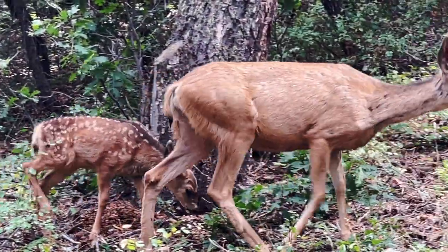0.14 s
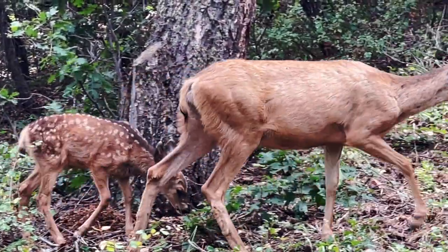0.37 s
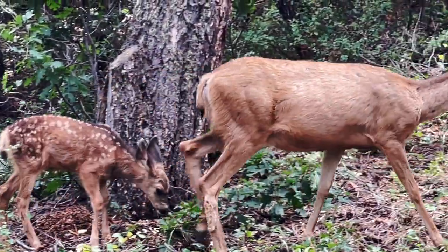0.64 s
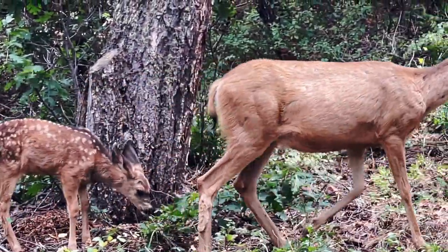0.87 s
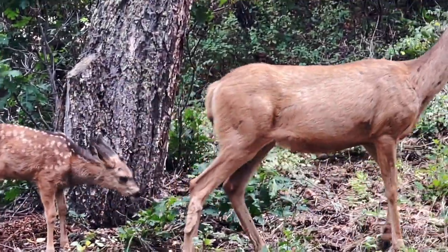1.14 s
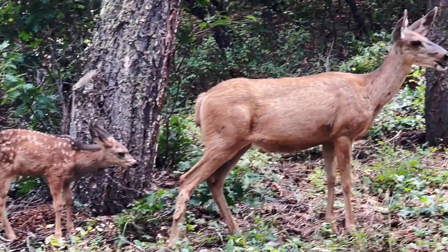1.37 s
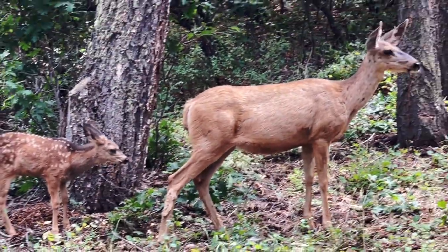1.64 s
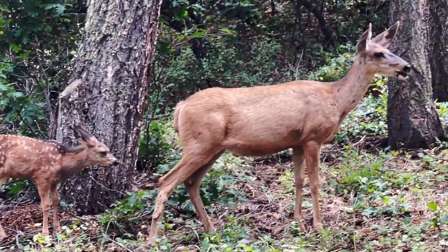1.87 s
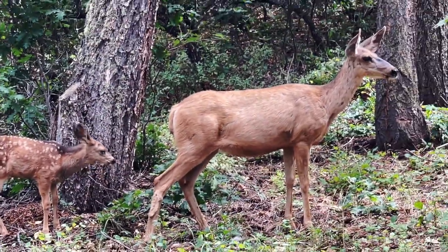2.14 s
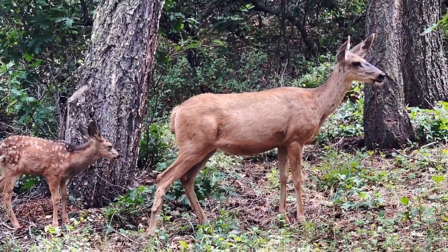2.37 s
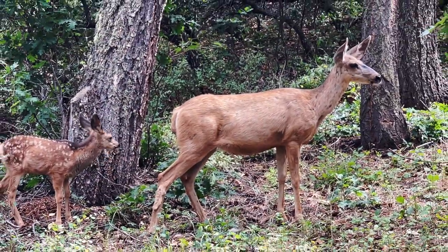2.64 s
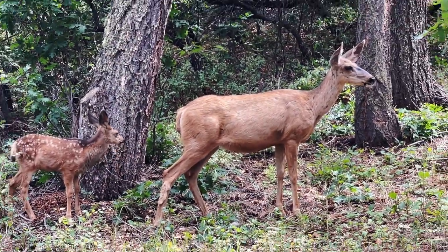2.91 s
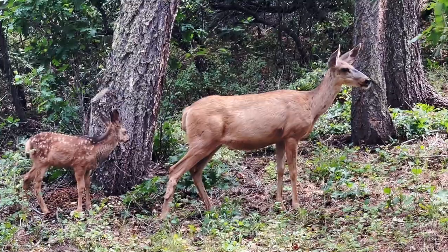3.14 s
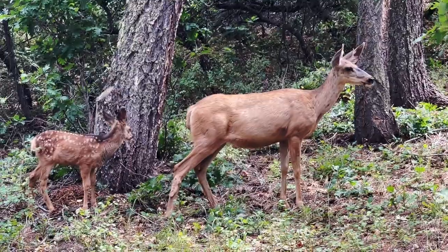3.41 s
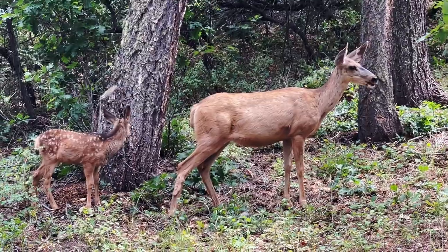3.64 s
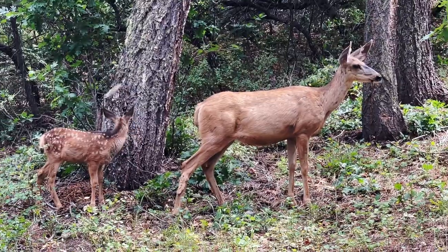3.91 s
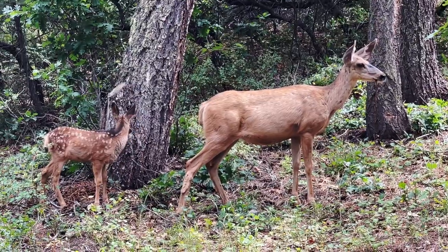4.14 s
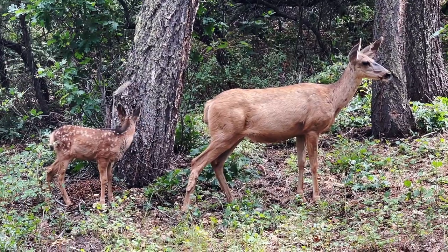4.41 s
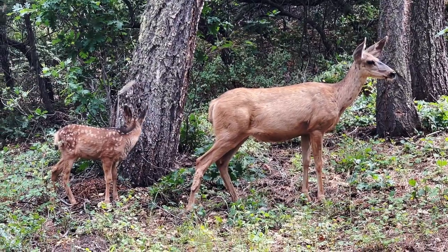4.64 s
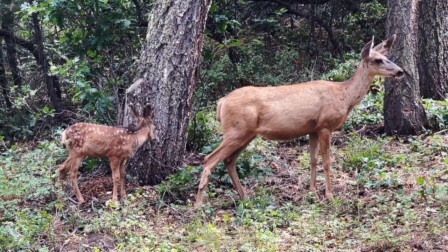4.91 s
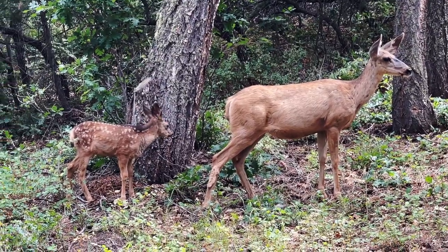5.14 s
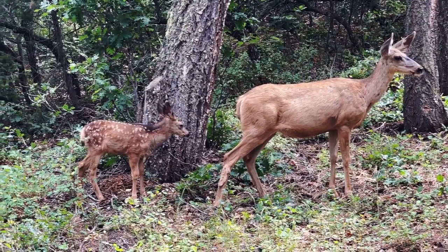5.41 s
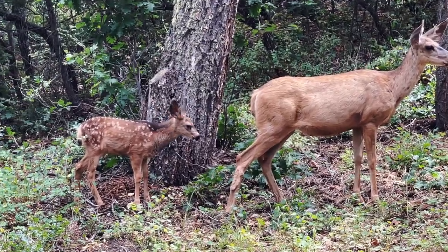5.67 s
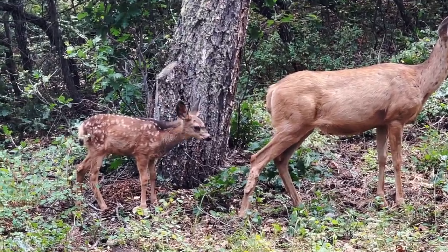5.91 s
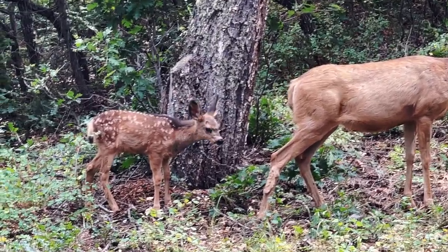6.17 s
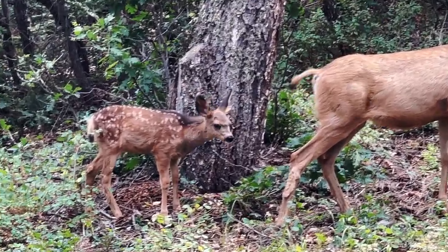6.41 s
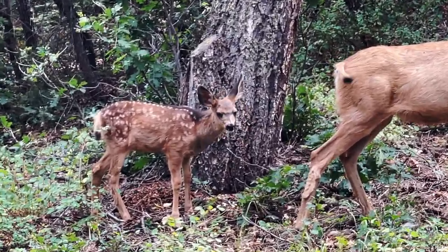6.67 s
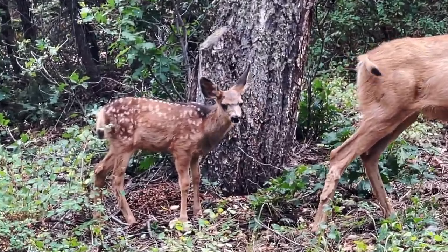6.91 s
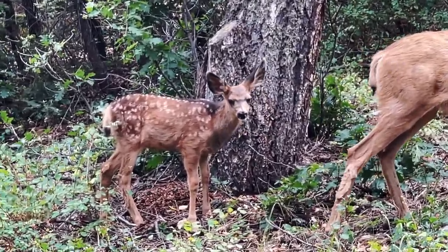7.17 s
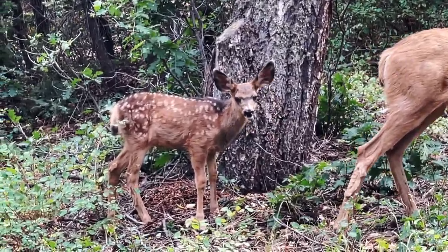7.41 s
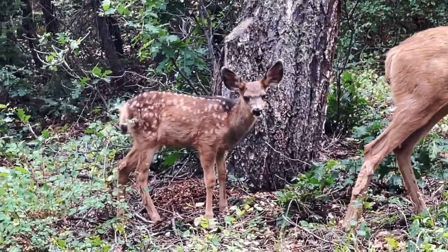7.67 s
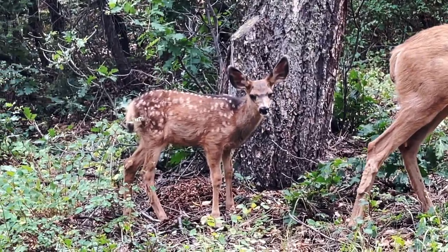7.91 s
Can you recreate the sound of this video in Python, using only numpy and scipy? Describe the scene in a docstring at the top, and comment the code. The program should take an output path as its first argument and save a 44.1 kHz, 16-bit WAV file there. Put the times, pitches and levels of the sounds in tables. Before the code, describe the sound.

A calm forest with a doe and fawn, heard only as surroundings. Thin insect shimmer and soft air noise run throughout, with tiny dry leaf rustles and a pulsing cricket-like tone at first. A loud, clear bird then sings six rapid four-note phrases, nearly four per second, with short woody echoes. When it stops, remote chips, a repeated echoing song, faint caws and small wing buzzes carry on to the end.

```python
"""A songbird close by sings one burst of six four-note phrases of gliding tones in a summer wood.
Farther birds whistle, chip and caw as frequency-modulated tones, blurred by echoes off the trunks.
Insects drone, sound thin tones and buzz, some as throbbing or gated noise bands; leaves rustle briefly.
Filtered noise gives a faint band that swells while the near bird sings, a low rumble, a hum and
microphone hiss; further treble noise rises with the near song's level."""
import sys
import numpy as np
from scipy import signal
from scipy.io import wavfile
from scipy.ndimage import uniform_filter1d

SR = 44100
rng = np.random.default_rng(int(sys.argv[2]) if len(sys.argv) > 2 else 0)


def linear_from_db(decibels):
    """Turn decibels (scalar or array-like) into linear amplitude factors; 0 gives 1."""
    return 10 ** (np.asarray(decibels, float) / 20)


def waveform_to_disk(signal):
    """Save audio, clipped to [-1, 1], as 16-bit WAV at the path in sys.argv[1]."""
    frames = np.transpose(np.atleast_2d(signal))
    scaled = np.clip(frames, -1, 1) * 32767
    samples = np.round(scaled).astype(np.int16)
    wavfile.write(sys.argv[1], SR, samples)


N = 355000

# Pitch and level contours of bird notes, before each note's own pitch, level and length are applied:
# name: (time after the start [ms], frequency [Hz], relative level [dB])
NOTE_SHAPES = { "flick": [(-9, 1192, -31.5), (-4, 2600, -24.5), (0.5, 3560, -9), (3, 3850, -1),
               (4, 3800, -5.5), (7, 3230, 3), (8.5, 2820, -8), (11.5, 2566, -1), (16.5, 2420, -13),
               (19, 1900, -33)], "scoop": [(-2, 3730, -28.5), (1, 3600, -14), (5, 2700, -6.5),
               (8.5, 2510, 1), (10.5, 2440, -2.5), (16.5, 2450, -3), (18.5, 2600, -5.5), (24.5, 2400, -25)],
               "slide": [(-3, 3200, -20.5), (2.5, 3250, -4), (7.5, 3150, -2.5), (17, 2800, 2),
               (31, 2620, -2.5), (34, 2700, -22)], "wave": [(-2, 2043, -22), (4, 2060, -11),
               (11, 2200, -11), (17, 2680, 2), (23.5, 2950, -5.5), (31.5, 3000, -3), (39, 2720, -10.5),
               (44, 2280, -9), (48.5, 2090, -7.5), (63.5, 2036, -10), (71, 1990, -23)],
               "chip": [(0, 2500, -17.5), (4, 3050, -9.5), (8, 3420, -2.5), (13, 3490, 1), (19, 3400, -2),
               (24.6, 3200, -5.5), (29.3, 3050, -20)], "step": [(0, 2500, -7), (14.25, 2880, -13.5),
               (30.8, 3080, -4), (37.25, 2850, -7), (43.2, 2800, -6), (51.7, 2440, -0.5), (61.2, 2420, 4.5),
               (69, 2360, -26)], "slip": [(0, 3730, -4), (13.2, 3640, -2), (28, 3200, -10)],
               "arch": [(0, 2200, -28), (8, 2300, -1.5), (28.1, 2430, -5.5), (44.8, 2660, -5.5),
               (57, 2690, -4), (70.6, 2350, 0), (81.7, 2080, -16.5), (106.1, 1800, -21.5),
               (139, 1560, -20)], "peak": [(0, 2150, -19), (4.96, 2400, -0.5), (14.47, 2620, -5),
               (21.7, 2640, -6), (31, 2280, -2), (38, 2080, -29)], "pip": [(0, 2660, -8), (13, 2660, 0),
               (27, 2630, -9.5)], "droop": [(0, 2080, -9.5), (15.1, 2150, -7), (35, 2170, 0.5),
               (60.7, 2040, -6.5), (86, 1850, -12.5), (100, 1720, -15)], "vee": [(0, 4450, -5),
               (10, 4150, -14), (24, 3600, -4), (33, 3300, 0), (43, 3000, -22), (53, 2950, -3),
               (63, 3450, 2), (70, 4000, -11), (75, 4350, -5), (79, 4450, -16)], "cup": [(0, 2480, 1),
               (17.6, 2220, 2), (36, 2400, -11)], }
# Phrases of the far bird with an arching last note: (time [s], level [dB], note spacing factor [1])
ARCH_PHRASES = [(5.213, -53, 1.02), (5.665, -50, 1.02), (6.116, -50.5, 1.01), (6.593, -51, 1.015)]


def rms_one(x):
    """Normalization: divides a signal by its root mean square."""
    return x / np.sqrt(np.mean(x ** 2) + 1e-20)


def band(x, low_hz, high_hz, order=2):
    """Band limitation: a Butterworth filter passes one range of frequencies."""
    return signal.sosfilt(signal.butter(order, [low_hz, high_hz], "band", fs=SR, output="sos"), x)


def at_hz(points, hz):
    """Logarithmic frequency scale: interpolates a spectrum linearly in log frequency."""
    points = np.array(points)
    return np.interp(np.log(hz), np.log(points[:, 0]), points[:, 1])


def drift(rate_hz):
    """Random fluctuation: white noise through a two-pole low-pass, with an rms of 1."""
    pole = np.exp(-40 * np.pi * rate_hz / SR)  # run at SR / 20
    white = rng.standard_normal(N // 20 + 4002)
    slow = signal.lfilter([1], [1, -2 * pole, pole * pole], white)[4000:]  # without the onset
    return np.interp(np.arange(N) / 20, np.arange(len(slow)), rms_one(slow))


def add(out, rows, partials=((1, 0),), pan_db=0, rough=0):
    """Frequency modulation: adds harmonics whose phase is the integral of a gliding, jittered pitch."""
    # rows: (time [s], frequency [Hz], rms level [dB]); partials: (multiple [1], level [dB])
    s, hz, db = np.transpose(rows)
    at = np.arange(round(s[0] * SR), min(round(s[-1] * SR), N))
    t = at / SR
    # rough is the rms pitch jitter as a share of the pitch
    jitter = rms_one(uniform_filter1d(rng.standard_normal(SR), size=80))[:len(at)]
    pitch = uniform_filter1d(np.interp(t, s, hz), size=60) * (1 + rough * jitter)
    phase = 2 * np.pi * np.cumsum(pitch) / SR
    fade = np.clip(np.minimum(t - s[0], s[-1] - t) / .002, 0, 1)  # 2 ms at both ends
    start = rng.uniform(0, 2 * np.pi)
    tone = sum(linear_from_db(k_db) * np.sin(k * (phase + start)) for k, k_db in partials)
    ears = linear_from_db(np.array([[pan_db / 2], [-pan_db / 2]]))  # positive pan_db: louder on the left
    out[:, at] += np.sqrt(2) * linear_from_db(np.interp(t, s, db)) * fade * tone * ears


def placed(shape, s, db, pitch, length=1):
    """Scaling of a contour: sets its onset and level, and multiplies its pitch and duration."""
    return np.array(shape) * [length / 1000, pitch, 1] + [s, 0, db]  # ms to s


def wood(x, parts, gap_s):
    """Reverberation: convolution with exponentially decaying noise, independent in each ear."""
    # parts: (60 dB decay time [s], echo level [dB]); the echoes build up over gap_s
    t = np.arange(2 * SR) / SR
    echo = 0
    for t60, db in parts:
        tail = rng.standard_normal((2, len(t))) * linear_from_db(-60 * t / t60) * np.clip(t / gap_s, 0, 1)
        echo = echo + linear_from_db(db) * tail / np.sqrt(np.sum(tail ** 2, axis=1, keepdims=True))
    return x + signal.fftconvolve(x, echo, axes=1)[:, :N]


def bursts(rows, noise, rise_s):
    """Amplitude gating: noise under a trapezoid for each row (time [s], duration [s], level [dB])."""
    t = np.arange(N) / SR
    gates = [linear_from_db(db) * np.clip(np.minimum(t - s, s + length - t) / rise_s, 0, 1) for s, length, db in rows]
    return noise * sum(gates)


def drone():
    """Amplitude modulation: resonant noise bands of many insects throb in loose step."""
    # Resonances of the insect chorus: (center frequency [Hz], width [Hz], relative level [dB])
    resonances = [(5240, 420, -5), (5407, 56, -5.5), (5518, 156.97, -1.5), (5681.7, 79, -8),
                  (5766, 247, -4.5), (6056, 355, -10)]
    # Course of the mean level of both ears: (time [s], rms level [dB])
    level_points = [(0.0, -59.5), (.52, -57), (.94, -58.5), (2.6, -56.5), (3.85, -58), (5.83, -57.4),
                    (7.548, -57), (8.05, -57.5)]
    throb_hz = 30.5 + 0.8841 * drift(1.6942)
    throb = np.sin(2 * np.pi * np.cumsum(throb_hz) / SR)
    out = 0
    for hz, width, db in resonances:
        grain_db = 1.678 * throb + 1.3 * drift(60)
        noise = rng.standard_normal((2, N)) * linear_from_db(grain_db)
        out = out + linear_from_db(db) * rms_one(band(noise, hz - width / 2, hz + width / 2, order=3))
    level = np.interp(np.arange(N) / SR, *np.transpose(level_points))
    return linear_from_db(level + np.array([[.8], [-.8]])) * rms_one(out)


def floor():
    """Partial coherence: air, far rumble and hiss in third octaves, each with its own ear correlation."""
    # Shape of the noise spectrum: (frequency [Hz], relative spectral density [dB per Hz])
    spectrum = [(25, -22), (60, -6), (120, -11), (180, -7), (284, -15), (342, -10), (572, -15), (1150, -15),
                (2030, -20), (3000, -18.5), (4500, -24.5), (5800, -33.5), (7300, -42), (11000, -33),
                (15800, -37.5)]
    # Likeness of the two ears: (frequency [Hz], left-right correlation [1])
    correlation = [(60, 0.73), (130, 0.6955), (290, 0.23), (640, -0.4), (1410, -0.069), (3100, -0.4534),
                   (6820, -0.32), (15000, 0.25)]
    out, edges = 0, 25 * 2 ** np.arange(0, 9.5, 1 / 3)
    white = rng.standard_normal((2, 2, N))
    for k, (low, high) in enumerate(zip(edges, edges[1:])):
        mid, side = band(white[k % 2], low, high, order=4)  # neighbors use different noise
        hz = np.sqrt(low * high)
        alike = np.clip(at_hz(correlation, hz), -1, 1)
        ears = np.sqrt(1 + alike) * mid + np.sqrt(1 - alike) * side * [[1], [-1]]
        out = out + linear_from_db(at_hz(spectrum, hz)) * ears
    return linear_from_db(-63.5) * rms_one(out)


def hum():
    """Narrow-band noise: a bandwidth of a few hertz makes a low hum waver, alike in both ears."""
    center_hz, width_hz, level_db = 77.66, 9.2, -68
    noise = band(rng.standard_normal(N), center_hz - width_hz / 2, center_hz + width_hz / 2)
    return linear_from_db(level_db) * rms_one(noise)


def swelling_band():
    """Incoherent noise: a faint band, independent in the two ears, swells while the near bird sings."""
    # Course of the level before its random fluctuation: (time [s], rms level [dB])
    level_points = [(0.0, -85), (1.05, -83), (1.23, -72.5), (1.55, -68), (1.9, -62), (2.85, -65),
                    (3.1, -69.5), (4.35, -78), (4.62, -76.5), (8.05, -75.5)]
    level = np.interp(np.arange(N) / SR, *np.transpose(level_points))
    return rms_one(band(rng.standard_normal((2, N)), 3400, 5150)) * linear_from_db(level + 1.7 * drift(8))


def rumble():
    """Random amplitude modulation: low noise swells and fades, alike in both ears."""
    level_db, swing_db, rate_hz = -68, 1.5, 1.9
    noise = rms_one(band(rng.standard_normal(N), 62, 117.7))
    return noise * linear_from_db(level_db + swing_db * drift(rate_hz))


def caws():
    """Harmonic spectrum: a throat weights the multiples of a nasal, falling fundamental."""
    # Contour of a caw: (time after the start [ms], frequency [Hz], relative level [dB])
    contour = [(0, 317, -13), (30, 327.5, -6.5), (111.7, 326, -2.5), (149.3, 306.5, -4), (193.6, 291, -1),
               (250, 279.5, -8.5)]
    # Calls: (time [s], level [dB], pitch factor [1])
    calls = [(.235, -64, 0.99), (1.680, -65.5, 0.99), (2.850, -65.5, 0.94), (4.200, -66.5, 0.93),
             (5.600, -65.5, 0.93), (6.90, -64.5, 0.99)]
    # Throat in the first part of a caw: (multiple of the fundamental [1], level [dB])
    throat = [(2, -11), (3, -19.5), (4, -2.5), (5, -5.5), (6, -1.5), (7, -22)]
    # Throat as the caw falls, with fewer harmonics: (multiple of the fundamental [1], level [dB])
    falling_throat = [(4, -17), (5, -13.5), (6, -2)]
    out = np.zeros((2, N))
    for call in calls:
        add(out, placed(contour[:3], *call), throat, rough=0.011)
        add(out, placed(contour[2:], *call), falling_throat, rough=0.0066)
    return out


def rustles():
    """Broadband friction: dry leaves as brief bursts of bright noise."""
    # Rustles: (time [s], duration [s], level [dB])
    rows = [(.265, 0.022, -63), (.50, 0.026, -64), (1.025, .025, -61.5), (3.79, 0.017, -63),
            (5.15, 0.01033, -74), (5.61, 0.01808, -77)]
    return bursts(rows, rms_one(band(rng.standard_normal((2, N)), 3400, 6400)), rise_s=0.006)


def far_whistles():
    """Linear frequency glide: short bird whistles, each loudest midway."""
    # Whistles: (time [s], duration [s], start frequency [Hz], end frequency [Hz], rms level midway [dB])
    whistles = [(0.417, 0.015, 4000, 3950, -73), (4.767, 0.027, 4350, 4140, -68),
                (5.24, .025, 4370, 3520, -69), (5.432, 0.027, 3600, 3350, -66),
                (.481, .029, 3110, 3680, -64), (.550, .02, 3720, 3930, -70), (.615, .02, 3780, 3870, -72),
                (0.706, 0.028, 3900, 3750, -72), (1.137, .015, 2400, 2350, -64),
                (1.145, .017, 3970, 3780, -63), (1.171, .05, 4220, 3700, -59.5),
                (1.375, 0.031, 3910, 3650, -63), (1.467, .025, 3850, 4070, -69),
                (1.548, .05, 4310, 3600, -56), (3.346, 0.039, 2214, 2680, -58.5),
                (3.349, .064, 4734, 4720, -62), (3.441, 0.025, 2673, 2530, -59.5),
                (3.49, 0.14, 2270, 2283, -66), (3.915, 0.035, 3900, 3030, -65),
                (4.705, 0.035, 3440, 3880, -65), (6.582, 0.021, 3960, 4060, -56.5),
                (4.136, 0.024, 4140, 3990, -62.5), (4.212, 0.018, 3940, 3980, -70),
                (4.298, 0.024, 2150, 2610, -62), (4.373, 0.021, 2040, 2670, -57.5),
                (4.365, .014, 3670, 4200, -64), (4.51, 0.02, 2200, 2720, -59.5),
                (4.833, 0.019, 3900, 3790, -58.5), (4.827, 0.096, 2420, 2413, -70.5),
                (5.608, 0.014, 3800, 4200, -58), (6.023, .057, 4570, 3960, -70),
                (6.488, 0.03, 2316, 1580, -63.5), (6.543, 0.041, 3100, 3490, -58),
                (6.853, 0.031, 3360, 3580, -60)]
    out = np.zeros((2, N))
    for s, length, start, end, db in whistles:
        middle = (s + length / 2, (start + end) / 2, db)
        add(out, [(s, start, db - 3.0), middle, (s + length, end, db - 5.0)], rough=.02)
    return out


def far_songs():
    """Frequency modulation: shaped far notes, kept apart by how strongly their echoes return."""
    # Single notes by shape: (time [s], level [dB], pitch factor [1], left-right level [dB])
    single_notes = { "chip": [(.506, -54.5, 0.99, -3), (.580, -50.5, 0.96, -3), (.664, -52.5, 0.95, -2.5),
                    (1.158, -51, 0.99, -4), (1.240, -50, .965, -1), (1.336, -51.5, 0.95, -1),
                    (3.675, -54, 1.01, -7), (3.775, -48, .97, -0.5), (4.456, -51.5, 0.97, -5),
                    (4.552, -49.5, 0.98, .6)], "peak": [(5.017, -56.5, 0.98, 4), (5.132, -59, 0.98, 0)],
                    "droop": [(3.490, -60.5, 1.01, -8), (6.745, -64, .99, -5)],
                    "cup": [(4.008, -59, 1.05, 2), (4.421, -60, 1.71, .1), (5.086, -61.5, 1.04, 2),
                    (5.396, -68, 1.88, 2)], }
    # Notes of the arching phrase: (shape name, time after the start [ms], relative level [dB])
    arch_notes = [("step", 0, -4.5), ("slip", 103, -9), ("arch", 160, 0)]
    # Notes of the phrase that opens with a vee: (shape name, time after the start [ms], relative level [dB])
    vee_notes = [("vee", 0, -2), ("peak", 118, 4.5), ("pip", 203, 0), ("droop", 262, 0)]
    # Phrases that open with a vee: (time [s], level [dB], note spacing factor [1])
    vee_phrases = [(6.911, -61.5, 1.005), (7.342, -61.5, .995), (7.775, -61, .99)]
    deep, in_open = np.zeros((2, 2, N))
    songs = [(deep, arch_notes, -5.5, ARCH_PHRASES), (in_open, vee_notes, -9.5, vee_phrases)]
    for place, notes, pan_db, phrases in songs:
        for s, db, spacing in phrases:
            for name, ms, note_db in notes:
                note = placed(NOTE_SHAPES[name], s + spacing * ms / 1000, db + note_db, 0.99)
                add(place, note, pan_db=pan_db, rough=0.018)
    for name, notes in single_notes.items():
        place = deep if name == "chip" else in_open
        for *note, pan_db in notes:
            add(place, placed(NOTE_SHAPES[name], *note), pan_db=pan_db, rough=0.012906)
    return deep, in_open


def thin_tone():
    """Amplitude modulation: a jittered tone, perhaps a cricket, swells in soft pulses."""
    # Pulses: (time [s], duration [s], rms level midway [dB])
    pulses = [(.555, 0.048, -69.5), (.625, 0.053, -62), (.69, 0.029, -70.5), (.78, .09, -74),
              (.915, .06, -73), (.99, 0.037, -65), (1.035, 0.024, -62.5), (1.10, .07, -71),
              (1.305, 0.081, -72.5), (1.37, 0.073, -65), (1.43, 0.11, -66.5)]
    tone_hz, edge_loss_db = 2153, 11
    out = np.zeros((2, N))
    for s, length, db in pulses:
        edge_db = db - edge_loss_db
        rows = [(s, tone_hz, edge_db), (s + length / 2, tone_hz, db), (s + length, tone_hz, edge_db)]
        add(out, rows, rough=0.015)
    return out


def rasps():
    """Noise bands: raspy far notes too fast and blurred to hold a pitch."""
    # Rasps: (time [s], duration [s], low edge [Hz], high edge [Hz], level [dB])
    far_rasps = [(1.167, 0.064, 3510, 4310, -64), (4.361, 0.1, 3570, 4260, -74),
                 (5.382, 0.062, 4230, 4680, -67), (5.607, 0.052, 3550, 5000, -63.5),
                 (6.032, 0.051, 3930, 4680, -64), (6.537, .079, 3290, 4460, -64),
                 (6.86, 0.13, 3300, 3700, -67.5)]
    # Blur inside each arching phrase: (low edge [Hz], high edge [Hz], level re phrase [dB])
    low_hz, high_hz, rasp_db = (2810, 3480, -15.5)
    noise = rng.standard_normal(N)
    after_s, length_s = .1, .15
    blurs = [(s + after_s, length_s, low_hz, high_hz, db + rasp_db) for s, db, _ in ARCH_PHRASES]
    out = 0
    for s, length, low, high, db in far_rasps + blurs:
        out = out + bursts([(s, length, db)], rms_one(band(noise, low, high, order=3)), rise_s=0.021)
    return out


def near_bird():
    """Frequency modulation: gliding whistles, with treble noise that rises with the song's level."""
    # Phrases: (time [s], level of the flick [dB], length factor [1], hold after the flick's top [ms],
    # level gained by the last note [dB])
    phrases = [(1.6021, -32, 1.02, .1, 3), (1.8583, -27, 0.98, 0.11, 0.36),
               (2.1001, -26.5, 0.98, 0.13, 0.65), (2.3414, -25, .979, .1, -1),
               (2.5840, -25.5, .985, 4.1, 0.3), (2.8323, -25.5, 1.01, .1, -0.95)]
    # Notes after the opening flick: (shape name, time after the start [ms], relative level [dB])
    later_notes = [("scoop", 29.5, 0), ("slide", 59.8, -.5), ("wave", 128.5, 2.5)]
    # Steep tick ahead of each phrase: (time after the start [ms], frequency [Hz], relative level [dB])
    tick = [(-9.5, 3000, -30.5), (-7.5, 4000, -18.5), (-2, 4800, -16.5), (1.5, 5600, -27)]
    # Harmonics of each whistle: (multiple of the fundamental [1], level [dB])
    overtones = [(1, 0), (2, -41), (4, -53), (5, -52), (6, -54)]
    # Treble noise heard with the song: (low edge [Hz], high edge [Hz], level re mean rectified song [dB])
    treble_bands = [(4200, 7050, -37.5), (7585, 7600, -57), (10700, 14300, -39)]
    # Quick and long echoes off the trunks: (60 dB decay time [s], level [dB])
    echoes = [(0.349, -5.5), (1.6, -16.5)]
    full_db, pitch_per_db = -26, .004  # softer notes come out flatter
    out = np.zeros((2, N))
    for s, db, length, hold_ms, gain_db in phrases:
        flick = np.array(NOTE_SHAPES["flick"], float)
        flick[np.argmax(flick[:, 1]) + 1:, 0] += hold_ms
        notes = [(flick, 0, 0)]
        notes += [(NOTE_SHAPES[name], hold_ms + length * ms, note_db) for name, ms, note_db in later_notes]
        add(out, placed(tick, s, db, 0.99), rough=0.027)
        for shape, ms, note_db in notes:
            effort_db = db + gain_db * ms / notes[-1][1]
            pitch = 1 + pitch_per_db * (effort_db - full_db)
            note = placed(shape, s + ms / 1000, effort_db + note_db, pitch, length)
            add(out, note, overtones, pan_db=0.6, rough=0.0022)
    out = wood(out, echoes, gap_s=0.0073)
    loudness = uniform_filter1d(np.abs(out), size=1200, axis=1)
    treble_noise = 0
    for low, high, db in treble_bands:
        noise = rms_one(band(rng.standard_normal((2, N)), low, high, order=3))
        treble_noise = treble_noise + linear_from_db(db) * noise
    return out + loudness * treble_noise


def buzzes():
    """Periodic amplitude modulation: fast insect wing strokes pulse a band of noise."""
    # Buzzes: (time [s], duration [s], level [dB])
    rows = [(3.14, 0.11, -73), (4.09, 0.057, -66.5), (5.855, 0.096, -65.5), (7.30, 0.078, -63.5)]
    strokes_per_s = 100
    strokes = (.5 + .5 * np.sin(2 * np.pi * strokes_per_s * np.arange(N) / SR)) ** 1.4
    noise = band(strokes * rng.standard_normal((2, N)), 6120, 7560, order=4)
    return bursts(rows, rms_one(noise), rise_s=0.01384)


def low_tone():
    """Pure tone: one sinusoid glides slightly in pitch and level."""
    # Contour: (time [s], frequency [Hz], rms level [dB])
    contour = [(7.70, 1050, -82), (7.78, 1053, -83.5), (8.05, 1040, -78)]
    out = np.zeros((2, N))
    add(out, contour)
    return out


def scene():
    """Superposition: all sources add, and birds in the open raise weaker echoes."""
    # Quick and long echoes of the far wood: (60 dB decay time [s], level [dB])
    echoes = [(0.399, -1.5), (1.4, -0.5)]
    deep, in_open = far_songs()
    in_open = in_open + caws() + far_whistles() + thin_tone() + low_tone()
    share = linear_from_db(-2.5)  # echo strength in the open
    echoing = deep + share * in_open + rasps() + buzzes() + rustles()
    # the rest of the open sound is added without echo, so its direct sound stays whole
    far = wood(echoing, echoes, gap_s=0.0039) + (1 - share) * in_open
    return near_bird() + far + drone() + swelling_band() + rumble() + floor() + hum()


def roll_off(x):
    """The treble ends steeply here."""
    return signal.sosfilt(signal.butter(12, 16010, fs=SR, output="sos"), x)


def record(dry):
    """Signal chain: the finished mix passes through one last stage."""
    return roll_off(dry)


dry = scene()
out = record(dry)
waveform_to_disk(out)
```